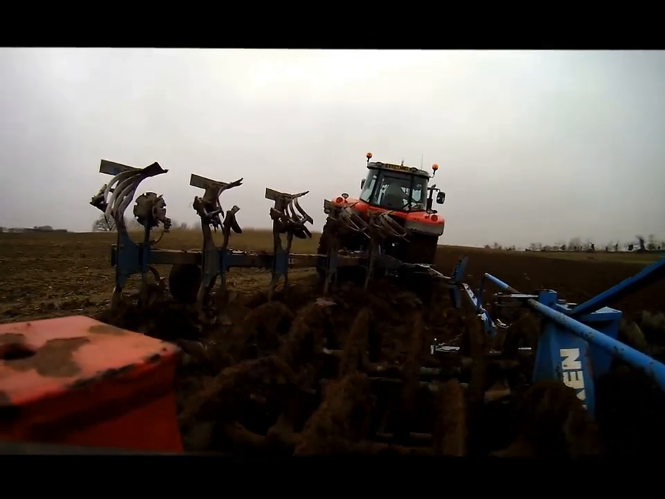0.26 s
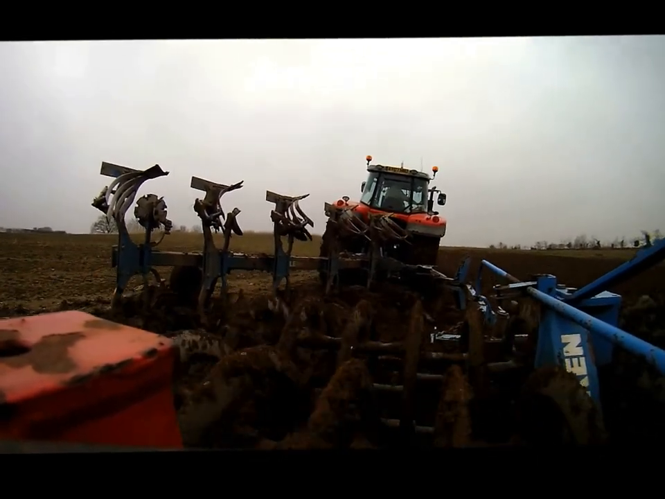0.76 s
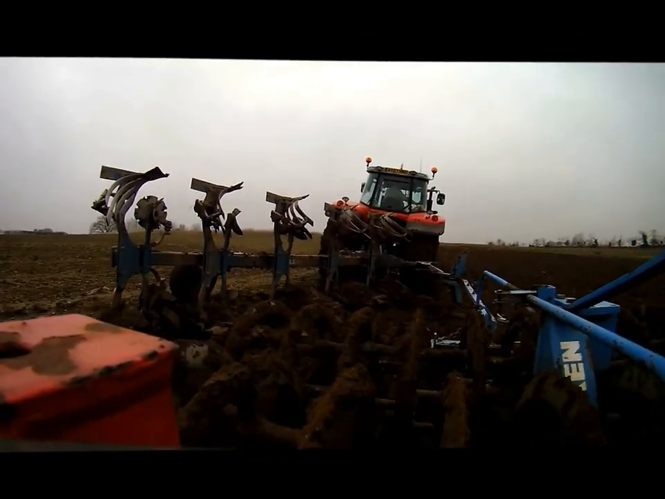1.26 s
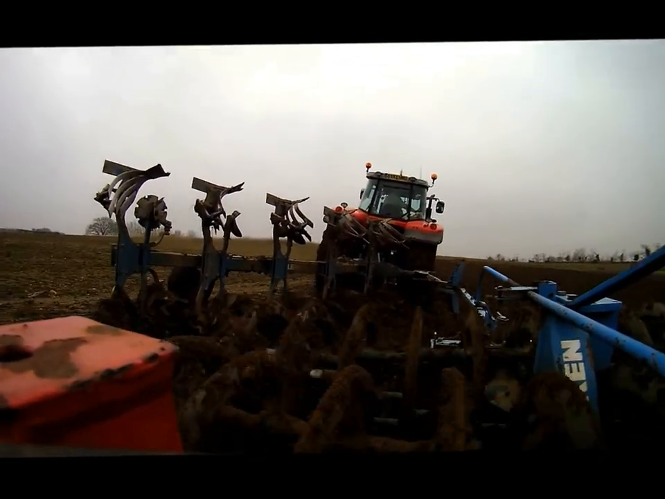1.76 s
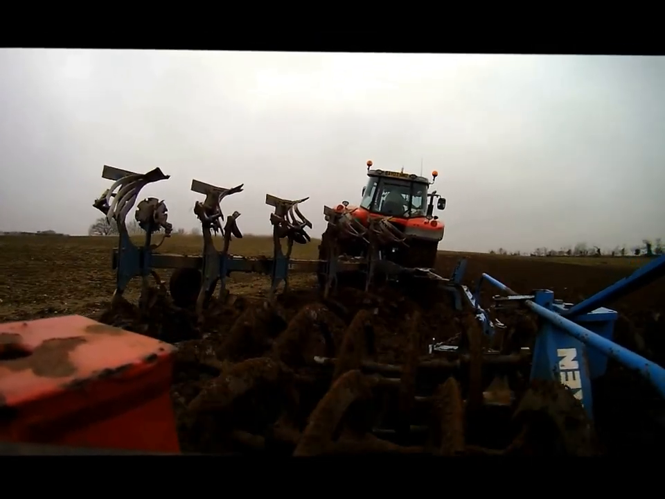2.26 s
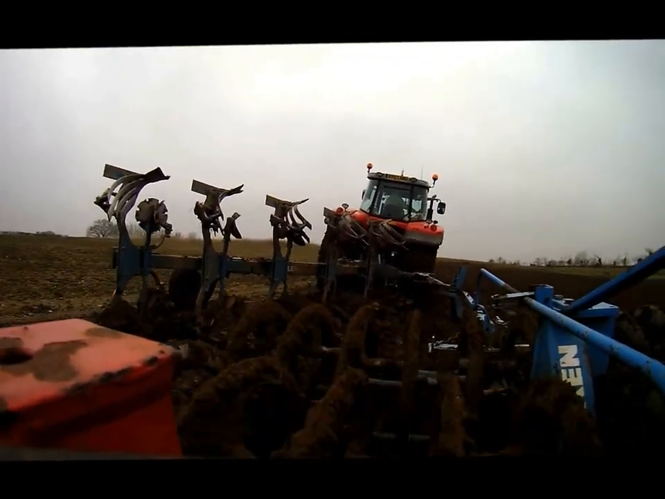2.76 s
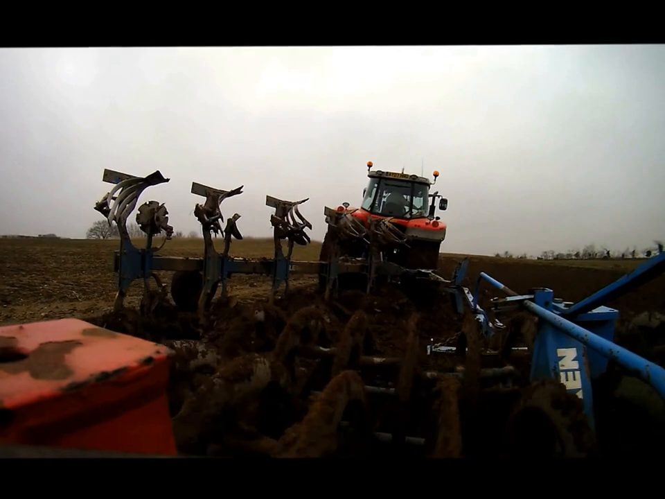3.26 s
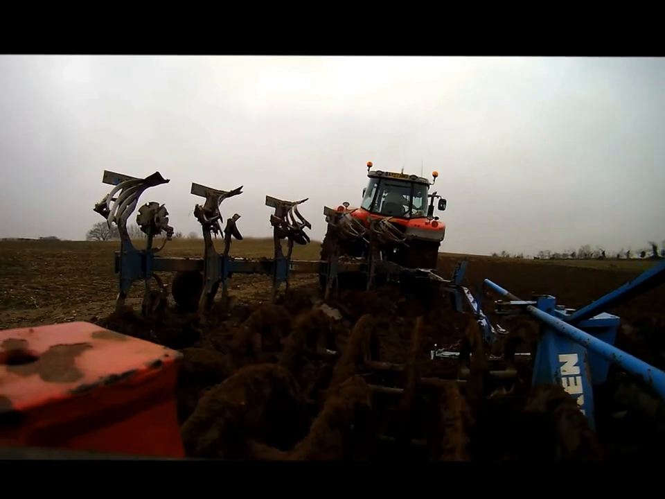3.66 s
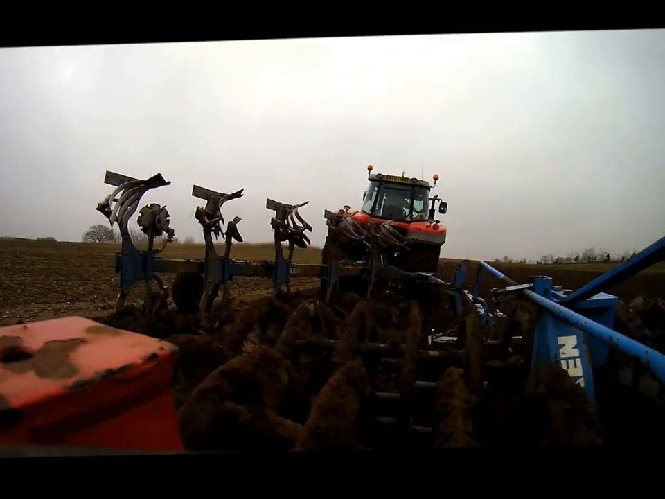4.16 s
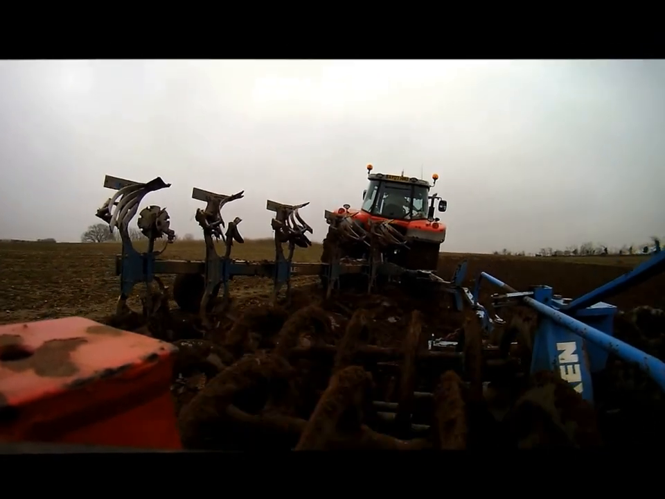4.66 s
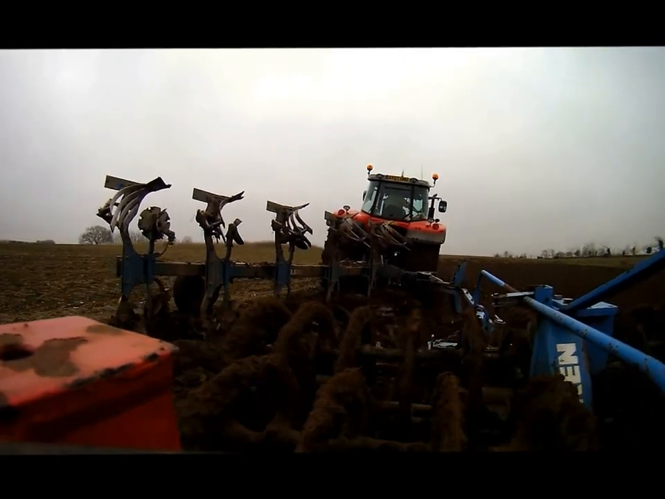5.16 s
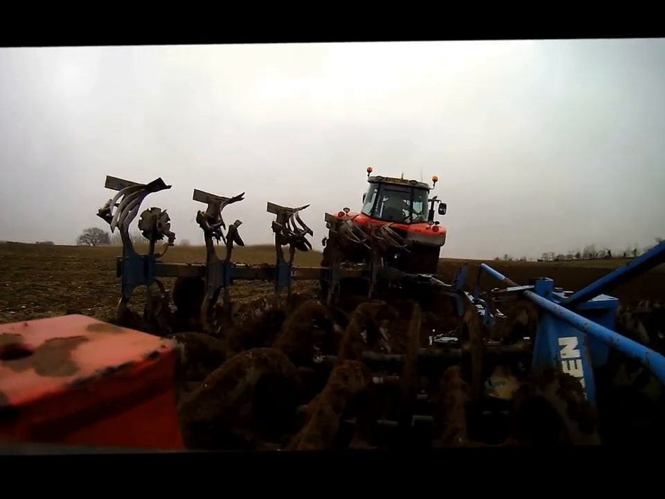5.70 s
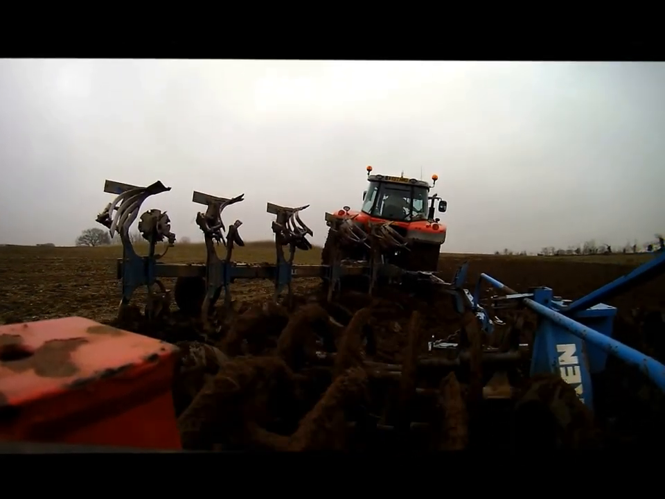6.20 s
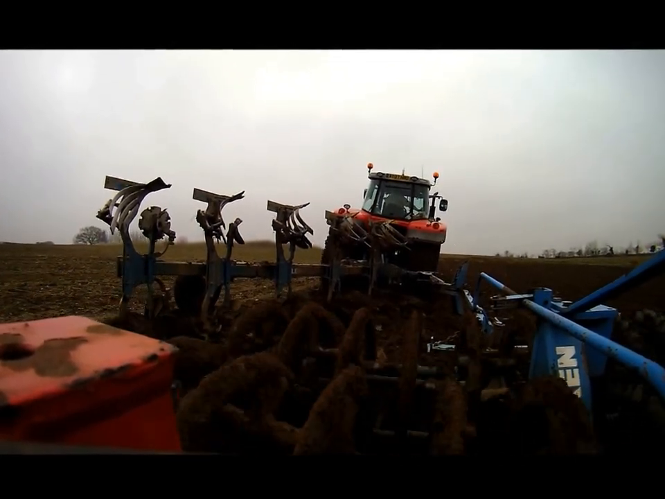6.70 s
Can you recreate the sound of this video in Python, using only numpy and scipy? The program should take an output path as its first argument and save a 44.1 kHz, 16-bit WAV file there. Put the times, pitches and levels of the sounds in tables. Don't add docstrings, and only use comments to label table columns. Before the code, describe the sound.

A deep wavering hum with a hollow boom as a cast-iron furrow press rolls through ploughed soil, ticking and clunking, struck by one violent overloaded clang.

```python
import sys
import numpy as np
from scipy import signal
from scipy.fft import rfft, irfft
from scipy.io import wavfile
from scipy.ndimage import uniform_filter1d

SR = 44100
rng = np.random.default_rng(int(sys.argv[2]) if len(sys.argv) > 2 else 0)


def invert_db(x):
    u = np.asarray(x, float) / 20
    return 10 ** u


def pcm_store(signal):
    levels = np.round(np.clip(np.atleast_2d(signal), -1, 1) * 32767)
    wavfile.write(sys.argv[1], SR, levels.astype(np.int16).T)


N = 306054
TIME = np.arange(N) / SR

# pitch in Hz, level in dB, time to fade by 60 dB in seconds.
PANEL_MODES = [(416, -12.5, 0.082), (520, -4, 0.11), (592, 0.5, 0.081), (834, -13, 0.25)]
SHELL_MODES = [(900, -10.5, 0.17), (999, -3, 0.095), (1107, -10.5, 0.1), (1271, -7, 0.09),
               (1370, -2.5, 0.087), (1520, -0.5, 0.065), (1560, -6.5, 0.099), (1783, -16, 0.18),
               (1806, -27.5, 0.086)]
LINK_MODES = [(1998, -15, 0.075), (2218, -16.5, .15), (2533, -6, 0.054), (2960, -9, .14),
              (3049, -3.5, 0.086), (3415, -12.5, 0.13), (3584, -6.5, 0.073), (3826, -10.5, 0.073),
              (4300, -22, 0.17), (4550, -17.5, 0.14), (4930, -18.5, 0.12)]
# pitch in Hz, gain in dB.
STEEL_PATH = [(20, -20), (45, 6.5), (170, -5.5), (400, -20.5), (570, -17.5), (730, -34.5), (1000, -20.5),
              (1450, -14), (1900, -23), (2600, -25), (2900, -32), (4800, -37.5), (6500, -50), (9000, -60)]


def clamp(pitch_hz):
    # start in seconds, level in dB, hold in seconds, fade in dB per second.
    swings = [(0, -27, .41, 477), (.52, -21, 0.29, 896), (.88, -27.5, 0.0086, 603), (1.03, -28, .06, 101),
              (1.1, -21.5, 0.042, 402), (1.55, -24.5, 0.17, 548), (1.84, -29, .01, 200),
              (2.06, -19, .1, 100), (2.17, -13, 0.11, 280), (2.41, -17, 0.023, 344), (2.5, -25, .31, 298),
              (2.93, -24, 0.074, 548), (3.09, -20.5, 0.18, 94.5), (3.272, -7.5, 0.032, 121),
              (3.43, -24, 0.1, 51), (3.75, -17.5, .01, 219), (3.87, -23.5, .01, 280),
              (4.04, -20.5, 0.13, 100), (4.34, -16, 0.011, 70), (4.61, -24, .01, 62),
              (4.78, -22, 0.078, 701), (4.96, -20, 0.071, 85), (5.28, -19.5, 0.011, 110),
              (5.41, -17.5, .21, 92), (5.77, -19, .16, 63), (6.06, -15, .05, 79), (6.26, -17.5, .02, 47.5),
              (6.43, -18, 0.011, 205), (6.6, -17.5, 0.027, 203), (6.74, -27.5, 0.24, 60)]
    level_db = curves(swings, rise_db_s=218, rest_db=-36)
    phase = 2 * np.pi * np.cumsum(pitch_hz + 2.2 * walk(25)) / SR
    return np.sqrt(2) * invert_db(level_db + 1.5 * walk(30)) * np.sin(phase)


def beam():
    # start in seconds, level in dB, hold in seconds,
    # fade in dB per second.
    jolts = [(0, -21, .002, 279), (.22, -35.5, 0.097, 399), (.44, -28, .18, 110),
             (.836, -16.5, .002, 550.5), (.85, -24.5, .002, 104), (1.214, -31.5, 0.296, 500),
             (1.63, -27, 0.083, 119.5), (2.008, -32.5, 0.0022, 176), (2.112, -13, 0.0018, 380),
             (2.126, -17.5, 0.0018, 125), (2.212, 6, 0.03, 420), (2.285, -15, .002, 179.5),
             (2.48, -29.5, .02, 240), (2.69, -33.5, .02, 201), (2.81, -35, 0.066, 238.5),
             (3.02, -35.5, .06, 128), (3.268, -18.5, 0.023, 199.5), (3.295, -23.5, 0.0045, 299),
             (3.34, -33.5, 0.12, 77), (3.62, -35, .002, 142.5), (3.83, -35.5, 0.018, 100.5),
             (4.03, -38, 0.42, 302), (4.45, -30, .002, 71), (4.65, -32, .08, 79.5),
             (4.98, -36, 0.045, 70.5), (5.5, -36, .01, 51), (5.85, -30, 0.0015, 41), (6.36, -28, .02, 202),
             (6.48, -34.5, .002, 43), (6.69, -32, 0.011, 61)]
    rest_db = -40.5
    level_db = curves(jolts, 1099.5, rest_db)
    pitch_hz = 299.6 - 0.37 * (level_db - rest_db)
    wander_hz = 4.5 * np.clip(-level_db / 30, 0.1, 1) * walk(50)
    phase = 2 * np.pi * np.cumsum(pitch_hz + wander_hz) / SR
    first = np.sqrt(2) * invert_db(level_db + 2.0 * walk(40)) * np.cos(phase)
    second = unit(ring(rng.standard_normal(N), [(311.5, -6, 0.32), (270.2, -6.5, 0.17)]))
    return first + invert_db(np.minimum(level_db, -13) - 3) * second


def soil(level_db):
    rumble = rng.standard_normal(N) * invert_db(0.6 * walk(13))
    patter = invert_db(10.5) * rumble + grains(300, 3.4, 0.0048)
    for modes, part_db in ((PANEL_MODES, -5), (SHELL_MODES, -2), (LINK_MODES, 0)):
        damped = [(hz, db / 2, 0.5 * t60) for hz, db, t60 in modes]
        patter = patter + invert_db(part_db) * unit(ring(grains(180, 2.8, 0.0034), damped))
    heard = colour(patter, STEEL_PATH)
    middle = band(heard, 1100, 1800)
    return invert_db(level_db) * heard / np.sqrt(np.mean(middle ** 2))


def blows():
    # start in seconds, shell level in dB, shell pitch in Hz, panel level in dB, link level in dB.
    hard_blows = [(0.833, -20, 1100, -38, -51), (2.108, -10.5, 900, -17, -32.5),
                  (2.127, -19, 1410, -29, -31), (2.15, -14, 1373, -27.5, -29.5),
                  (2.177, -13, 1392, -27.5, -24), (2.196, 8.5, 1381, -14, -6), (2.207, 5, 1100, -15, 9),
                  (2.213, 3, 1380, -12, -6), (2.223, 5, 1474, -19.5, 2.5), (2.236, -4, 1374, -21.5, -9.5),
                  (2.252, -8.5, 1350, -21.5, -18), (2.27, -20.5, 1340, -13.5, -31)]
    s, shell_db, shell_hz, panel_db, link_db = np.transpose(hard_blows)
    free_links = [(hz, db, 1.2 * t60) for hz, db, t60 in LINK_MODES]
    links = strike(s, link_db - 6, 3500, free_links, 0.0006, 18)
    return hit_frame(s, shell_db, shell_hz, panel_db) + links


def stones():
    # start in seconds, shell level in dB, shell pitch in Hz, panel level in dB.
    clunks = [(0.187, -25, 1560, -57), (0.3478, -29, 1560, -33.5), (0.4425, -25, 1570, -49),
              (0.4833, -27.5, 1000, -35.5), (0.5285, -14.5, 1200, -19.5), (0.7534, -32, 1520, -39),
              (0.8158, -31, 1640, -46), (0.8332, -20.5, 1370, -25.5), (0.9692, -30.5, 1580, -30.5),
              (1.5594, -26.5, 1560, -43), (1.6307, -30, 1560, -38), (1.6583, -21, 1580, -37),
              (1.6937, -30, 1500, -33), (2.0573, -19, 1409, -27.5), (2.1111, -2.5, 1560, -20),
              (2.1954, 5, 1430, -1.5), (2.378, -21, 1133, -21), (2.4231, -26.5, 1340, -47),
              (2.4588, -27, 1346, -41), (0.555, -26, 1420, -26.5), (2.7241, -24, 1280, -35),
              (2.9928, -20, 1560, -25.5), (3.2381, -16, 1150, -21.5), (3.2668, -16.5, 1490, -36.5),
              (3.6038, -21, 1730, -29), (4.4568, -29, 1520, -46), (4.7063, -20, 1530, -48),
              (4.7715, -28, 1344, -37), (4.85, -24, 1370, -29), (5.0928, -33, 1570, -51.5)]
    s, shell_db, shell_hz, panel_db = np.transpose(clunks)
    return hit_frame(s, shell_db, shell_hz, panel_db + 2.5)


def loose_links():
    # start in seconds, level in dB, pitch in Hz.
    ticks = [(0.2902, -33.5, 3800), (0.7583, -32.5, 2520), (0.813, -38.5, 2920), (0.9706, -30, 3170),
             (1.162, -33.5, 3400), (1.63, -33.5, 3070), (1.6577, -31, 2940), (1.7705, -32, 3470),
             (2.0301, -34, 2780), (2.08, -30.5, 2800), (2.1094, -24, 2930), (2.1628, -27.5, 3070),
             (2.2053, 6.5, 2950), (2.377, -25.5, 3200), (2.4626, -27.5, 3040), (2.7217, -38.5, 2960),
             (2.9906, -30.5, 3180), (3.115, -39, 2960), (3.294, -25.5, 2960), (0.349, -40, 3300),
             (3.6031, -26, 3500), (3.7886, -38.5, 3070), (4.459, -26.5, 3100), (4.772, -34.5, 2460),
             (5.2003, -38, 2995), (5.877, -40.5, 2700), (6.0125, -40, 3300), (6.2728, -27, 3100),
             (6.509, -34, 4000), (6.569, -35, 3300)]
    s, level_db, pitch_hz = np.transpose(ticks)
    damped = [(hz, db, 0.86 * t60) for hz, db, t60 in LINK_MODES]
    return strike(s, level_db, pitch_hz, damped, 0.00067, 22) + scrape(s, level_db + 23, 0.004)


def clods():
    # start in seconds, panel level in dB, panel pitch in Hz, arm level in dB.
    thuds = [(0.578, -19, 466, -28), (0.619, -29, 442, -35), (0.831, -28, 479, -27.5),
             (1.227, -27, 608, -50), (1.6, -24, 470, -23.5), (2.012, -47, 544, -31.5), (2.5, -31, 416, -40),
             (3.264, -18, 503, -20), (3.767, -40, 590, -33), (4.09, -40, 510, -45),
             (5.377, -34.5, 592, -34.5), (5.758, -40.5, 423, -31), (5.877, -30.5, 525, -41),
             (6.361, -39.5, 462, -32), (6.511, -35, 564, -49), (6.567, -37, 542, -38),
             (6.863, -33.5, 593, -36)]
    # pitch in Hz, level in dB, time to fade by 60 dB in seconds.
    arm_modes = [(44.4, -3.5, 0.11), (137, 4.5, 0.075), (210, 3, 0.19), (335, -11, 0.093)]
    s, panel_db, panel_hz, arm_db = np.transpose(thuds)
    panel = strike(s, panel_db, panel_hz, PANEL_MODES, 0.0018, 20)
    return panel + strike(s, arm_db, 280, arm_modes, 0.003, 3)


def hit_clicks():
    # start in seconds, level in dB.
    snaps = [(0.485, -39.5), (0.7542, -42), (1.5586, -39), (1.6494, -53), (2.383, -47.5), (2.914, -45.5),
             (2.993, -46), (3.2959, -45), (3.601, -39), (3.8647, -47), (3.975, -40), (4.0903, -42.5),
             (4.77, -40.5), (5.0941, -39.5), (5.8716, -45), (6.51, -47.5), (6.793, -45)]
    s, level_db = np.transpose(snaps)
    return band(scrape(s, level_db + 46, 0.0023), 1600, 9000)


def hit_frame(s, shell_db, shell_hz, panel_db):
    shell = strike(s, shell_db, shell_hz, SHELL_MODES, 0.0012, 30)
    panel = strike(s, panel_db, 524, PANEL_MODES, 0.0013, 20)
    return shell + panel + band(scrape(s, shell_db + 15, 0.006), 100, 9000)


def strike(s, level_db, spot_hz, modes, contact_s, focus_db_per_octave):
    out = 0
    chance = rng.random((len(s), len(modes), 2)) - 0.5
    flutter = invert_db(3.6 * walk(150))
    soft = np.exp(-1 / (contact_s * SR))
    for k, (hz, mode_db, t60) in enumerate(modes):
        near_db = np.maximum(-focus_db_per_octave * np.abs(np.log2(hz / spot_hz)), -14.)
        size = invert_db(level_db + mode_db + near_db + 3.9 * chance[:, k, 0])
        push = np.zeros(N, complex)
        np.add.at(push, (s * SR).astype(int), size * np.exp(2j * chance[:, k, 1]))
        fade = np.exp(-np.log(1000) / (t60 * SR))
        poles = np.exp(2j * np.pi * hz / SR) * np.array([soft, fade])
        tone = signal.lfilter([1 - soft], np.poly(poles), push).imag
        out = out + tone * np.roll(flutter, k * N // len(modes))
    return out


def scrape(s, level_db, decay_s):
    puffs = np.zeros(N)
    np.add.at(puffs, (s * SR).astype(int), invert_db(level_db))
    fade = np.exp(-1 / (decay_s * SR))
    swell = signal.lfilter([1 - fade], [1, -fade], signal.lfilter([1], [1, -fade], puffs))
    return colour(swell * rng.standard_normal(N), STEEL_PATH)


def grains(rate_hz, spread_db, crumble_s):
    sizes = invert_db(spread_db * rng.exponential(size=N).clip(0, 2.5))
    hits = (rng.random(N) < rate_hz / SR) * sizes
    crumble = signal.lfilter([1], [1, -np.exp(-1 / (crumble_s * SR))], hits)
    return unit(crumble * rng.standard_normal(N))


def ring(push, modes):
    out = 0
    for hz, mode_db, t60 in modes:
        pole = np.exp(2j * np.pi * hz / SR - np.log(1000) / (t60 * SR))
        out = out + invert_db(mode_db) * signal.lfilter([1], [1, -pole], push).imag
    return out


def curves(jolts, rise_db_s, rest_db):
    s, peak_db, hold_s, fade_db_s = np.transpose(jolts)[:, :, None]
    late = TIME - s
    rise = rise_db_s * invert_db(2 * np.maximum(peak_db + 16, 0)) * np.minimum(late, 0)
    fall = fade_db_s * np.maximum(late - hold_s, 0)
    return np.maximum((peak_db + rise - fall).max(axis=0), rest_db)


def colour(x, points):
    hz, db = np.transpose(points)
    log_hz = np.log(np.arange(2049) * SR / 4096 + 1)
    log_gain = np.interp(log_hz, np.log(hz), db) * np.log(10) / 20
    fold = irfft(log_gain) * np.r_[1, np.full(2047, 2.), 1, np.zeros(2047)]
    return signal.fftconvolve(x, irfft(np.exp(rfft(fold))))[:N]


def band(x, lo_hz, hi_hz):
    return signal.sosfilt(signal.butter(2, [lo_hz, hi_hz], "band", fs=SR, output="sos"), x)


def unit(x):
    return x / np.sqrt(np.mean(x ** 2))


def walk(rate_hz):
    k = int(SR / rate_hz)
    steps = np.repeat(rng.standard_normal(N // k + 1), k)
    return unit(uniform_filter1d(uniform_filter1d(steps, k), k)[:N])


def scene():
    # time in seconds, soil patter level in dB, clamp pitch in Hz.
    furrow = [(0.0, -41, 94.5), (1.22, -41.5, 91.2), (1.31, -43, 98.67), (1.47, -40.5, 91.26),
              (1.85, -42.5, 94.92), (2.18, -37, 89.97), (2.32, -38.5, 97.46), (2.45, -41.5, 89.4),
              (3.67, -42.5, 92.2), (4.27, -43, 89.9), (4.6, -43.5, 93.93), (5.22, -40.5, 87.43),
              (5.3, -43, 92.4), (6.32, -42.5, 90.65), (6.43, -43, 95.7), (6.94, -43, 92.4)]
    s, soil_db, clamp_hz = np.transpose(furrow)
    rolling = clamp(np.interp(TIME, s, clamp_hz)) + beam() + soil(np.interp(TIME, s, soil_db))
    knocks = blows() + stones() + loose_links() + clods() + hit_clicks()
    return (rolling + knocks)[None]


def band_limit(x):
    return signal.sosfilt(signal.butter(12, 15670, fs=SR, output="sos"), x)


def record(dry):
    hiss = invert_db(-71.5) * rng.standard_normal(dry.shape)
    flat = np.clip(dry + hiss, -0.97, 0.97)
    tilted = signal.sosfilt(signal.butter(1, 12, "high", fs=SR, output="sos"), flat)
    return band_limit(tilted.clip(-1, 1))


dry = scene()
out = record(dry)
pcm_store(out)
```